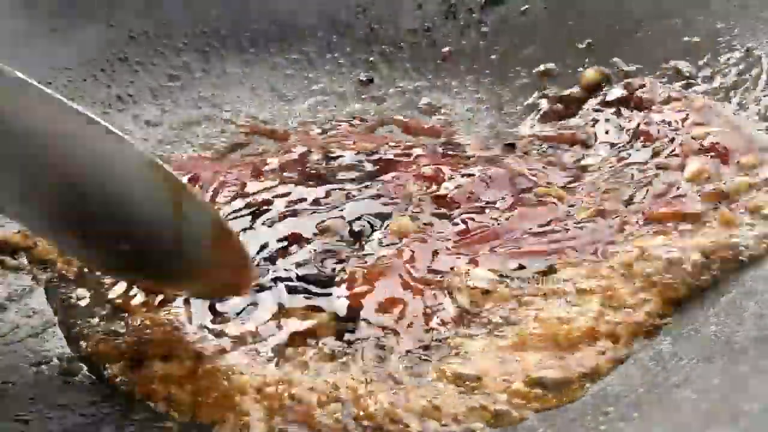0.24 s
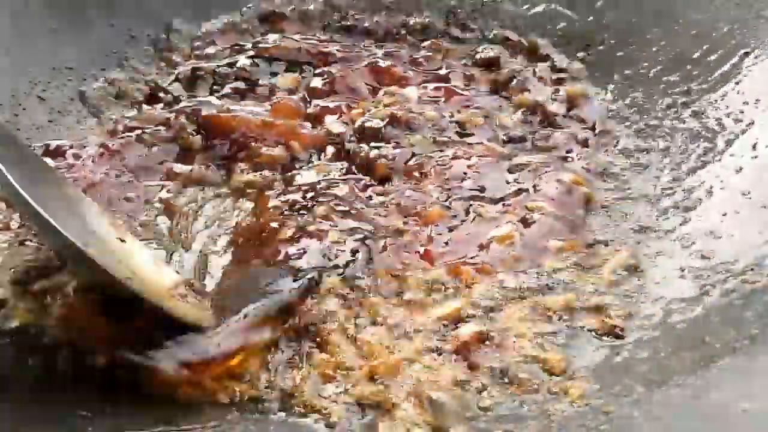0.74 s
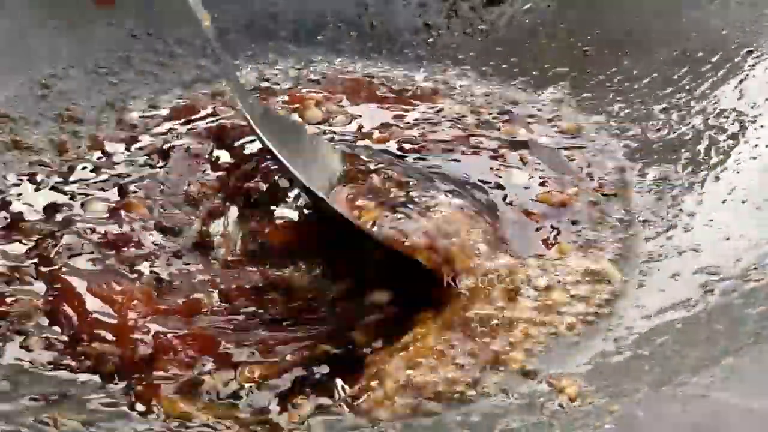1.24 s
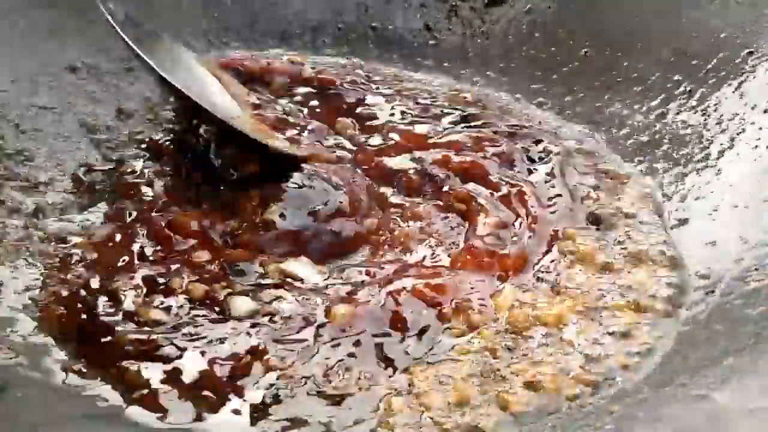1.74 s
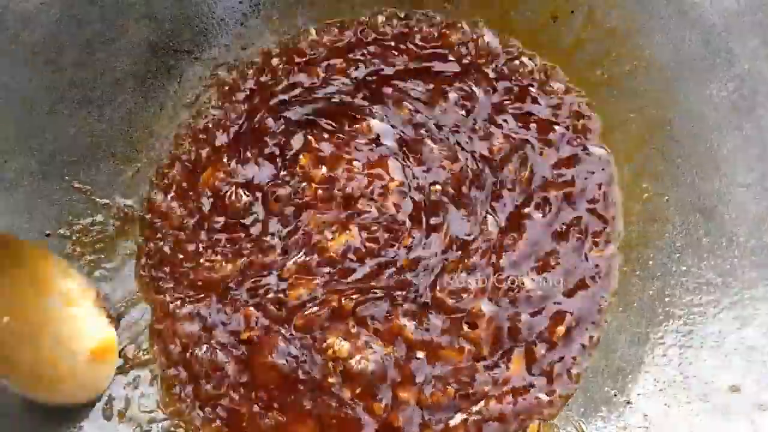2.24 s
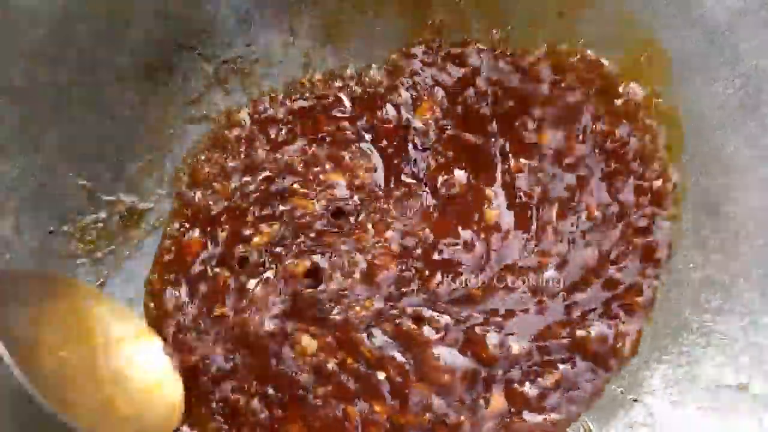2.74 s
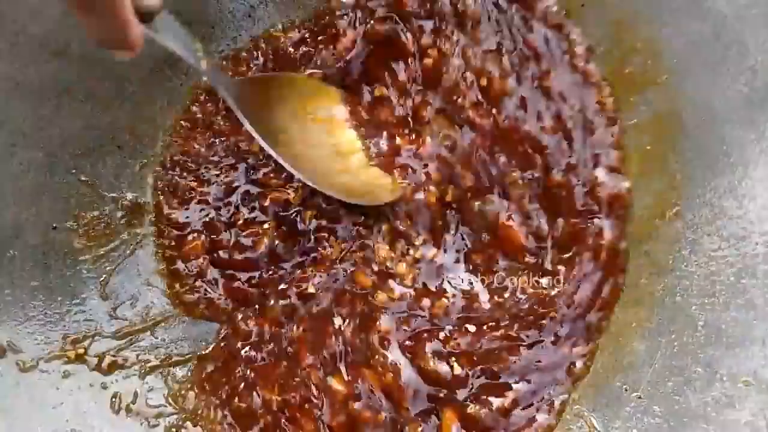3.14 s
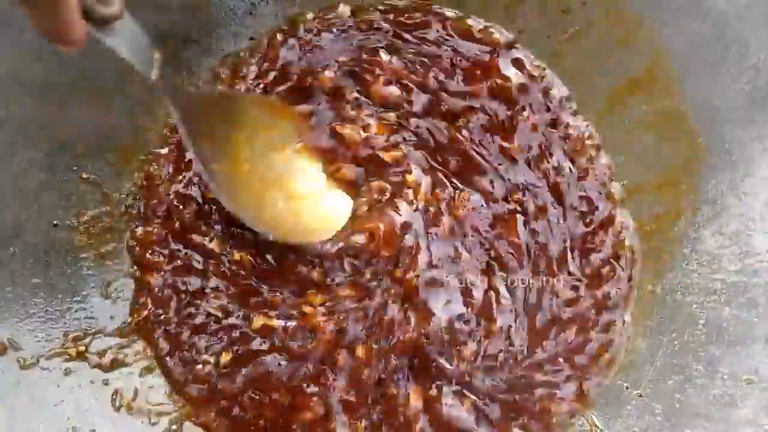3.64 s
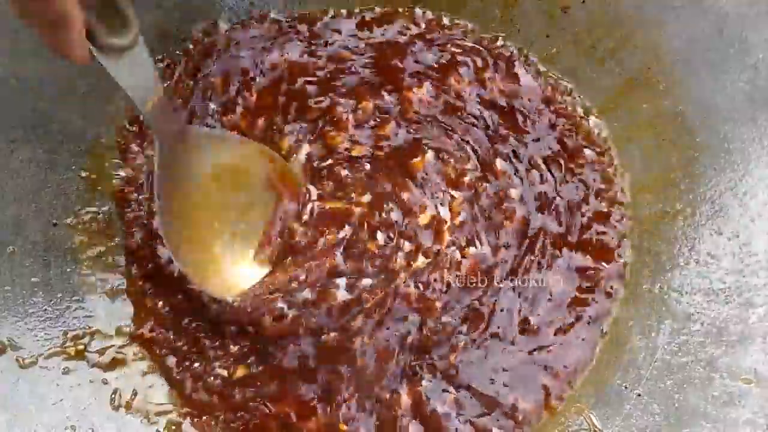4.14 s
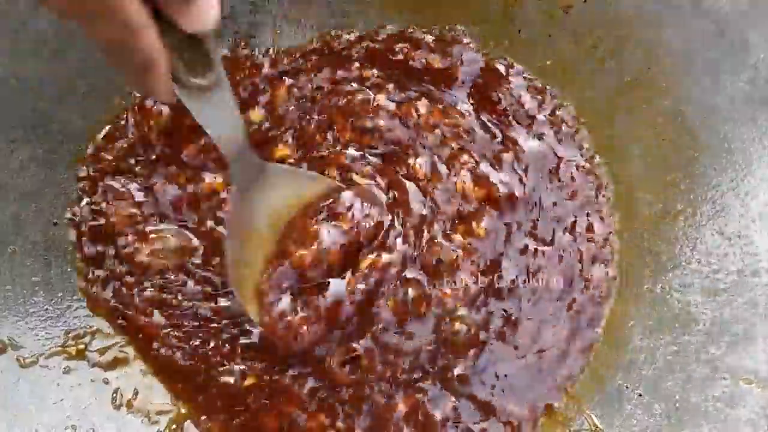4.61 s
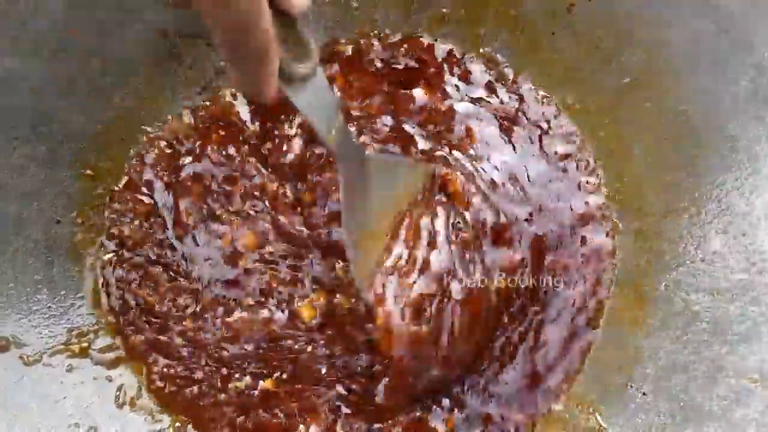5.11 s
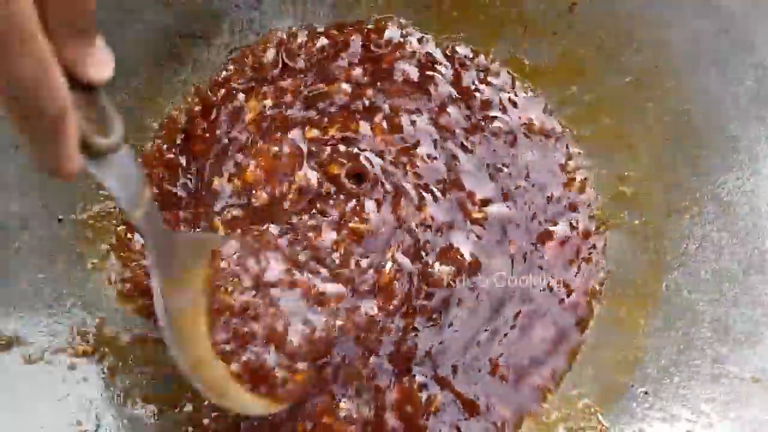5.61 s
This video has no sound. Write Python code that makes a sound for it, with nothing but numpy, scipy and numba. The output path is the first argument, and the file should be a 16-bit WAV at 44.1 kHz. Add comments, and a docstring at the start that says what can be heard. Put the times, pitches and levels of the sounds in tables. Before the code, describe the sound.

Sauce sizzles brightly in a wok, then bubbles thickly while a metal spatula stirs and scrapes the steel.

```python
"""Sugary sauce frying in a steel wok

Two scenes, heard from close by. First steam pockets burst in hot oil as a bright sizzle; after a
short silence the thickened sauce fades in, its bubbles ringing lower and wetter. A metal spatula
stirs throughout: stick-slip friction and impacts excite the steel, which answers with a dull ring."""
import sys
import numpy as np
from scipy import signal
from scipy.fft import rfft, irfft, next_fast_len
from scipy.io import wavfile
from scipy.ndimage import uniform_filter1d
from numba import njit

SR = 44100
rng = np.random.default_rng(int(sys.argv[2]) if len(sys.argv) > 2 else 0)


def pcm_store(signal):
    """Save signal as 16-bit PCM."""
    levels = np.round(np.clip(np.atleast_2d(signal), -1, 1) * 32767)
    wavfile.write(sys.argv[1], SR, levels.astype(np.int16).T)


N = 258867
TIME = np.arange(N) / SR


def frying(push, flare):
    """Rapid boiling: thin sauce meets hot oil and sizzles brightly while it is stirred."""
    # Spectra. Each row: frequency in Hz, relative level in dB.
    sizzle_spectrum = [(500, -16), (1200, -3), (2200, 2), (3200, -4.5), (4400, -9), (5100, -1), (7000, -6),
                       (9000, -2.5), (12000, -6), (15500, -11.5)]
    scrape_spectrum = [(150, -32), (600, -17), (1300, -9), (2000, -5), (3100, 4), (4400, 6.5), (5200, -9),
                       (7500, -8), (11000, -34)]
    bubble_spectrum = [(200, -26), (400, -11), (620, -6), (800, 3), (1000, -1.5), (1280, 5.5), (1750, -19),
                       (2500, -26)]
    # Sizzle of the sauce spreading over hot steel. Each row: time in seconds, relative level in dB.
    heat_curve = [(0.0, -25.5), (0.7, -28), (1.0, -24), (1.16, -25.5), (1.33, -23.5), (1.51, -25.5),
                  (1.68, -23), (1.93, -25), (2.02, -25)]
    # Cavity resonances of the left microphone port. Each row: centre in Hz, width in Hz, gain in dB.
    port_modes = [(8480, 220, 8), (10780, 1080, 22)]
    heat = from_db(in_time(heat_curve) - 6.5) + from_db(-19) * flare
    out = heat * sizzle(sizzle_spectrum, per_s=7000, spread_db=2.5, flutter_db=0.5, surge_db=1.37,
                        pan_db=-3.5)
    out += heat * from_db(-8) * crackle(per_s=530, spread_db=0.5, clump_db=4)
    blade = scrape(scrape_spectrum, blade_hz=3210, width_hz=1050, blade_db=-4, judder_db=0.5,
                   lag_ms=-0.046, pan_db=-1.4)
    bubbles = bubbling(bubble_spectrum, per_s=700, cycles=9.7, lag_ms=-0.1, pan_db=1)
    out += stirred(-30, push, 0.99) * blade
    out += stirred(-46.5, push, -15.5) * bubbles
    out += stirred(-47.5, push, -17.5) * wok_ring(tuning=1.054, per_s=1100, ringing=1, lag_ms=-0.04)
    out[0] = lift(out[0], port_modes)
    return out + rumble(level_db=-60.5, waver_db=4)


def simmering(push, flare):
    """Boiling in a viscous liquid: the thickened sauce bubbles and smothers the sizzle."""
    # Spectra. Each row: frequency in Hz, relative level in dB.
    sizzle_spectrum = [(500, -14), (1300, -2.5), (2300, -7), (3400, 10.5), (4900, 1), (5800, -9),
                       (8000, -8.5), (11000, -9.5), (13000, -12), (15500, -25)]
    scrape_spectrum = [(600, -26), (1400, -3), (1680, -4), (2100, 3), (2500, 1), (2900, 3), (3400, -1.5),
                       (4900, -1.5), (5900, -8), (8500, -16.5), (13000, -32)]
    bubble_spectrum = [(150, -19), (260, -5), (490, -4), (580, 3), (680, -1.5), (820, 0), (1000, -3),
                       (1220, 4.5), (1450, -6), (1700, -2.5), (2500, -20)]
    # The sauce heaves. Each row: time in seconds, relative bubbling level in dB.
    swell = [(2.4, -37), (3.03, -35), (4.09, -37.5), (5.21, -36.5), (5.41, -39.5), (5.85, -36)]
    # Cavity resonances of the right microphone port. Each row: centre in Hz, width in Hz, gain in dB.
    port_modes = [(10070, 580, 7.9), (11220, 810, 5)]
    steam = sizzle(sizzle_spectrum, per_s=5000, spread_db=2, flutter_db=1, surge_db=1.7, pan_db=-1)
    blade = scrape(scrape_spectrum, blade_hz=2425, width_hz=350, blade_db=0, judder_db=2,
                   lag_ms=0.425, pan_db=3)
    bubbles = bubbling(bubble_spectrum, per_s=2000, cycles=7.4, lag_ms=0.2, pan_db=0)
    out = stirred(-35.5, flare, 0.59) * steam
    out += stirred(-34, push, -0.68) * blade
    out += from_db(in_time(swell) + 2) * bubbles + plops()
    out += stirred(-47, flare, -5.5) * crackle(per_s=900, spread_db=-1.5, clump_db=3.5)
    out += stirred(-39.5, push, -26) * wok_ring(tuning=1, per_s=1400, ringing=0.5, lag_ms=0.17)
    out[1] = lift(out[1], port_modes)
    return out + rumble(level_db=-55.5, waver_db=3)


def sizzle(spectrum, per_s, spread_db, flutter_db, surge_db, pan_db):
    """Shot noise: steam pockets burst in clumps and surges, over a smooth hiss of far smaller ones."""
    bursts = grains(per_s, spread_db) * from_db(flutter_db * drift(150) + surge_db * drift(20))
    return place(bursts + 0.5 * rng.standard_normal((2, N)), spectrum, 0, pan_db)


def crackle(per_s, spread_db, clump_db):
    """Film rupture: thin sugary skins snap one by one, in little clusters."""
    # Each row: frequency in Hz, relative level in dB.
    spectrum = [(1200, -20), (2800, 2.5), (7000, 4), (11500, -4), (15500, -14)]
    snaps = grains(per_s, spread_db) * from_db(clump_db * np.minimum(drift(30), 1))
    return place(snaps, spectrum, 0, 0)


def bubbling(spectrum, per_s, cycles, lag_ms, pan_db, sizes=22):
    """Bubble resonance: each pop rings for a few cycles at a pitch set by the bubble's size."""
    pops = grains(per_s, 2.96)
    size_class = rng.integers(0, sizes, N)
    pitches_hz = np.geomspace(260, 2300, sizes)
    rings = sum(ring(pops * (size_class == k), hz, cycles / hz) * hz for k, hz in enumerate(pitches_hz))
    return place(rings, spectrum, lag_ms, pan_db)


def plops(swell_cycles=1.4, rise_per_s=4.9):
    """Damped oscillation: a big bubble swells and dies in a few cycles, its pitch rising as it opens."""
    # Each row: start in seconds, peak level in dB, starting pitch in Hz.
    big_bubbles = [(2.413, -29, 300), (2.452, -29, 327), (3.035, -27.5, 310), (3.222, -27.5, 560),
                   (3.484, -27, 335), (3.498, -27.5, 710), (3.74, -26, 340), (4.44, -29, 335)]
    out, t = np.zeros(N + SR), TIME[:SR // 10]
    for start, db, hz in big_bubbles:
        at, age = int(start * SR), t * hz / swell_cycles
        phase = 2 * np.pi * hz * (t + rise_per_s * t ** 2 / 2)
        out[at:at + len(t)] += from_db(db) * age * np.exp(1 - age) * np.sin(phase)
    return out[:N]


def spits(gain_db):
    """Flash boiling: a drop turns to steam on bare metal in one burst of noise."""
    # Each row: start in seconds, relative level in dB, decay in seconds, low and high band edges in Hz.
    drops = [(3.3627, -35, 0.016, 4100, 8900), (5.028, -41, 0.0068, 5500, 12500),
             (5.451, -35, .004, 8850, 11000)]
    return sum(band(from_db(db + gain_db) * impact(start, decay_s, chatter=0.93), low_hz, high_hz)
               for start, db, decay_s, low_hz, high_hz in drops)


def spatula():
    """Friction and impact: the edge rasps on bare metal, knocks, and makes the bowl groan when pushed."""
    # Each row: middle and nominal length in seconds, relative level in dB, start, end and width in Hz.
    rasp_contacts = [(.492, .023, -28, 3100, 2920, 160), (.5, .07, -35.5, 5250, 5500, 600),
                     (.513, .028, -28, 3740, 3560, 200), (.572, .065, -37, 2170, 1890, 280),
                     (.626, .05, -36.5, 2000, 2600, 1000), (.915, .1, -37, 2300, 2850, 700),
                     (1.4, .037, -33.5, 3000, 3370, 300), (2.63, .05, -35, 2450, 2650, 350),
                     (2.975, .058, -31, 2080, 2290, 220), (3.045, .025, -34.5, 3700, 3900, 1200),
                     (3.055, .05, -37, 1620, 1570, 400), (3.23, .06, -37, 4300, 4100, 1600),
                     (3.283, .05, -35.5, 2300, 2200, 900), (3.402, .029, -35, 2480, 2520, 140),
                     (3.562, .055, -34, 2170, 2370, 280), (3.688, .017, -33, 2000, 3600, 160),
                     (3.77, .017, -36.5, 2170, 2200, 120), (3.997, .036, -35, 2270, 2240, 240),
                     (4.29, .07, -35.5, 2600, 3200, 1100), (4.383, .034, -32.5, 2020, 2400, 260),
                     (4.68, .06, -37.5, 3400, 3600, 1200), (4.997, .026, -33.5, 3700, 4300, 1500),
                     (5.048, .05, -35, 2580, 2450, 280), (5.228, .07, -36, 2310, 2180, 400),
                     (5.64, .035, -32.5, 3640, 3560, 200), (5.665, .1, -36.5, 2500, 2100, 500),
                     (5.76, .085, -37, 1640, 1540, 360)]
    groan_contacts = [(.505, 0.091, -38, 470, 425, 22), (.6, 0.18, -43, 434, 402, 30),
                      (1.29, .075, -46.5, 417, 400, 50), (2.98, .088, -36, 416, 402, 35),
                      (5.622, 0.036, -33.5, 412, 400, 22), (5.69, 0.062, -32, 413, 392, 22),
                      (5.755, 0.031, -33, 377, 400, 22)]
    # Each row: frequency in Hz, relative level in dB.
    rasp_spectrum = [(150, -45), (600, -14), (1400, 0), (5300, 0), (6300, -9), (9000, -16)]
    groan_spectrum = [(60, -21), (150, -3), (330, 6.5), (520, 6.5), (1000, -48)]
    rasps = rubs(rasp_contacts, rasp_spectrum, grit_db=-8, judder_db=2, pan_db=1.5, voices=3)
    groans = rubs(groan_contacts, groan_spectrum, grit_db=-16, judder_db=0.5, pan_db=0, voices=2)
    taps = knocks(click_db=4, ring_db=-6, ring_t60=0.008, thud_hz=410, thud_t60=0.02)
    return from_db(7.5) * rasps + from_db(2.5) * groans + taps


def scrape(spectrum, blade_hz, width_hz, blade_db, judder_db, lag_ms, pan_db):
    """Stick-slip friction in the sauce excites the blade's damped resonance and the steel's."""
    # Upper modes of the steel. Each row: centre in Hz, width in Hz, gain in dB.
    steel_modes = [(1553, 91, -4), (2020, 100, -5.5)]
    slips = grains(6000, 2.7) * from_db(judder_db * drift(130))
    return place(lift(slips, [(blade_hz, width_hz, blade_db)] + steel_modes), spectrum, lag_ms, pan_db)


def rubs(contacts, spectrum, grit_db, judder_db, pan_db, voices):
    """Friction-driven resonance: metal slips on metal, and the pitch glides with the contact point."""
    force = np.zeros((voices, N))
    pitch_hz = np.full((voices, N), float(contacts[0][3]))
    width_hz = np.full((voices, N), float(contacts[0][5]))
    for k, (middle, length, db, start_hz, end_hz, width) in enumerate(contacts):
        voice = k % voices   # several parts of the edge can touch at once
        along = (TIME - middle) / length
        touching = abs(along) < 0.6
        force[voice, touching] += from_db(db) * np.cos(np.pi * along[touching] / 1.2)
        pitch_hz[voice, touching] = start_hz + (end_hz - start_hz) * (along[touching] + 0.5)
        width_hz[voice, touching] = width   # narrow on the edge, wide on the flat
    out = 0
    for pressure, hz, width in zip(force, pitch_hz, width_hz):
        slips = grains(6000, 6.1)
        tone = gliding_resonance(slips, 2 * np.pi * hz / SR, np.exp(-np.pi * width / SR))
        tone /= np.sqrt(uniform_filter1d(tone ** 2, size=500) + 1e-12)   # friction holds the swing steady
        judder = from_db(judder_db * drift(260))
        out += pressure * place(judder * (tone + from_db(grit_db) * slips), spectrum, 0, pan_db)
    return out


def knocks(click_db, ring_db, ring_t60, thud_hz, thud_t60):
    """Impact excitation: the edge clicks and rings at a pitch set by where it lands; the bowl thuds."""
    # Each row: start in seconds, relative edge level in dB, ring pitch in Hz, relative thud level in dB.
    strikes = [(.3949, -6.8, 3900, -17.5), (.3976, -10, 4400, -26), (1.018, -20, 4400, -24),
               (1.131, -26, 3300, -26), (1.245, -28, 3300, -22), (1.64, -28, 3300, -26),
               (2.931, -18, 2450, -32), (3.084, -16, 2510, -36), (3.764, -17, 1280, -33),
               (4.928, -18, 2280, -34), (4.9906, -7, 2520, -35), (5.033, -16.5, 2380, -36),
               (5.234, -17, 2150, -26)]
    out = 0
    for start, edge_db, hz, thud_db in strikes:
        edge = impact(start, chatter_s=0.003, chatter=0.3)
        push = impact(start, chatter_s=0.0018, chatter=0.018)
        click = from_db(click_db) * band(band(edge, 700, 5500), 700, 5500)
        out += from_db(edge_db) * (click + from_db(ring_db) * ring(push, hz, ring_t60))
        out += from_db(thud_db) * band(ring(push, thud_hz, thud_t60), 257, 690)
    return out


def wok_ring(tuning, per_s, ringing, lag_ms):
    """Modal vibration: rubbing and bursting bubbles shake the bowl, whose tuning depends on its load."""
    # Each row: frequency in Hz before tuning, relative level in dB, 60 dB decay time in seconds.
    low_modes = [(320, -2, 0.044), (370.6, -6, 0.1), (425, 3.5, 0.025), (470, -10, 0.04)]
    # Each row: frequency in Hz before tuning, relative level in dB.
    spectrum = [(90, -24.5), (190, -18.5), (250, -5.5), (310, -3.5), (400, -2.5), (470, -7), (560, -4),
                (800, -35), (2000, -56)]
    shoves = grains(per_s, 2.1)
    modes = sum(from_db(db) * ring(shoves, hz * tuning, t60) for hz, db, t60 in low_modes)
    vibration = ringing * rms_one(modes) + grains(per_s, 4.2)
    return place(vibration, np.array(spectrum) * [tuning, 1], lag_ms, 0)


def stirring():
    """Amplitude envelopes: each stroke pushes the blade, and the sizzle flares on the bared steel."""
    # Each row: start and length in seconds, relative push and flare levels in dB.
    strokes = [(-.04, 0.12, -29.5, -37), (0.13, 0.18, -48, -26), (0.438, 0.23, -29, -46),
               (0.806, 0.38, -32, -54), (1.19, 0.14, -38, -32), (1.5, 0.32, -37, -36),
               (1.858, 0.17, -38.5, -30), (2.38, 0.21, -30, -38.5), (2.56, 0.093, -27.5, -41),
               (2.908, 0.27, -30.5, -36), (3.174, 0.28, -31.5, -39.5), (3.501, 0.12, -29, -43),
               (3.79, 0.14, -33.5, -43), (3.933, 0.08, -28.5, -31), (4.118, 0.045, -27, -30),
               (4.2, 0.28, -32, -40), (4.557, 0.27, -30, -42.5), (4.9, 0.26, -31, -39),
               (5.142, 0.12, -31.5, -36.5), (5.599, 0.26, -29.5, -33)]
    push, flare = np.zeros((2, N))
    for start, length, push_db, flare_db in strokes:
        bearing_down = trapezoid(start, length, rise_s=0.025, fall_s=0.064)
        steam = trapezoid(start, length, rise_s=0.08, fall_s=0.03)   # lasts until the sauce flows back
        push = np.maximum(push, from_db(push_db) * bearing_down)
        flare = np.maximum(flare, from_db(flare_db) * steam)
    return push, flare


def rumble(level_db, waver_db):
    """Modulated low-frequency noise: the uneven background of the kitchen."""
    # Each row: frequency in Hz, relative level in dB.
    spectrum = [(20, -4), (45, -5), (100, -0.5), (150, -1), (220, -19), (600, -37), (3000, -51)]
    return from_db(level_db + waver_db * drift(7.1)) * place(rng.standard_normal((2, N)), spectrum, 0, 0)


def place(streams, spectrum, lag_ms, pan_db):
    """Partial coherence: two streams become a coloured stereo pair of rms 1, unrelated in the treble."""
    # Each row: frequency in Hz, left-right likeness from 0 to 1.
    likeness = [(30, 0.3), (120, 0.86), (350, 0.98), (700, 0.86), (1250, 0.65), (1600, .35), (2300, 0.41),
                (3500, 0), (15000, 0.05)]
    size = next_fast_len(N + 2048)
    hz = np.arange(size // 2 + 1) * SR / size
    mid, side = rfft(streams, size) * from_db(at_hz(spectrum, hz))
    alike = np.clip(at_hz(likeness, hz), 0, 0.995)
    mid, side = mid * np.sqrt(1 + alike), side * np.sqrt(1 - alike)
    delay = np.exp(-2j * np.pi * hz * lag_ms / 1000)
    left = (mid + side) * from_db(pan_db / 2)
    right = (mid - side) * delay * from_db(-pan_db / 2)
    return rms_one(irfft(np.array([left, right]), size)[:, :N])


def stirred(rest_db, drive, drive_db):
    """Power addition: the gain of a sound that goes on by itself and grows with the stirring."""
    return np.hypot(from_db(rest_db), from_db(drive_db) * drive)


def trapezoid(start, length, rise_s, fall_s):
    """A linear rise, a hold, and a fall centred on the end."""
    rise = np.clip((TIME - start) / rise_s, 0, 1)
    fall = np.clip((start + length - TIME) / fall_s + 0.5, 0, 1)
    return rise * fall


def grains(per_s, spread_db):
    """A Poisson process: two streams of random clicks of uneven size."""
    born = rng.random((2, N)) < per_s / SR
    size = from_db(spread_db * np.clip(rng.standard_normal((2, N)), -2.5, 2.5))
    return rms_one(born * size * rng.choice([-1, 1], (2, N)))


def impact(start, chatter_s, chatter):
    """An impulse and its exponentially dying chatter, different on each side."""
    out, at = np.zeros((2, N)), int(start * SR)
    out[:, at:at + 4096] = chatter * rng.standard_normal((2, 4096)) * np.exp(-TIME[:4096] / chatter_s)
    out[:, at] = 1
    return out


def ring(clicks, hz, t60):
    """A damped oscillator: a unit click sets a sine of height 1 ringing."""
    r, w = np.exp(-np.log(1000) / (t60 * SR)), 2 * np.pi * hz / SR
    return signal.lfilter([0, np.sin(w)], [1, -2 * r * np.cos(w), r * r], clicks + 1e-18)


def lift(x, modes):
    """Parallel resonances add to the direct sound."""
    return x + sum(from_db(db) * resonance(x, hz, width) for hz, width, db in modes)


def resonance(x, hz, width_hz):
    """A two-pole resonator with a peak gain of 1."""
    r = np.exp(-np.pi * width_hz / SR)
    feedback = [1, -2 * r * np.cos(2 * np.pi * hz / SR), r * r]
    return signal.lfilter(np.array([1, 0, -1]) * (1 - r * r) / 2, feedback, x + 1e-18)


@njit
def gliding_resonance(x, angle, radius):
    """A resonator whose centre and width move from sample to sample."""
    y = np.zeros_like(x)
    for i in range(2, x.shape[1]):
        r = radius[i]
        for c in range(x.shape[0]):
            drive = (1 - r * r) / 2 * (x[c, i] - x[c, i - 2])
            y[c, i] = drive + 2 * r * np.cos(angle[i]) * y[c, i - 1] - r * r * y[c, i - 2]
    return y


def band(x, low_hz, high_hz):
    """A band-pass filter."""
    sections = signal.butter(2, [low_hz, min(high_hz, 0.45 * SR)], "band", fs=SR, output="sos")
    return signal.sosfilt(sections, x + 1e-18)


def drift(per_s):
    """A random fluctuation of rms 1."""
    knots = rng.standard_normal(4000)
    return rms_one(np.interp(TIME * per_s, np.arange(len(knots)), knots))


def at_hz(points, hz):
    """Interpolation on a log-frequency axis."""
    known_hz, values = np.transpose(points)
    return np.interp(np.log(hz + 1), np.log(known_hz), values)


def in_time(rows):
    """Interpolation of a curve at every sample."""
    return np.interp(TIME, *np.transpose(rows))


def rms_one(x):
    """Scaling to unit power."""
    return x / np.sqrt(np.mean(x ** 2) + 1e-20)


def from_db(db):
    """Decibels to gain."""
    return 10 ** (np.asarray(db) / 20)


def scene():
    """Superposition: frying, then simmering, with spitting drops and the spatula on top."""
    # The two scenes. Each row: start and end in seconds.
    spans = [(-0.01, 2.039), (2.121, 5.9)]
    # The simmering dips briefly: middle and half length in seconds, depth in dB.
    lull = (5.475, 0.025, -3)
    lull_s, lull_half_s, lull_db = lull
    dip = from_db(lull_db * np.exp(-((TIME - lull_s) / lull_half_s) ** 2))
    first, second = [np.clip(np.minimum(TIME - start, end - TIME) / 0.00056, 0, 1) for start, end in spans]
    fade_s, fade_from = 0.27, 0.22
    fade_remaining = np.clip(1 - (TIME - spans[1][0]) / fade_s, 0, 1)
    fade_in = fade_from ** (fade_remaining ** 1.5)
    push, flare = stirring()
    sauce = first * frying(push, flare) + second * fade_in * dip * simmering(push, flare)
    return sauce + spits(gain_db=16.5) + spatula()


def record(dry, cutoff_hz=15800):
    """Band limiting: a steep low-pass cuts the top of the sound and of a faint noise floor."""
    hiss = from_db(-82) * rng.standard_normal((2, N))
    return signal.sosfilt(signal.ellip(12, 0.1, 90, cutoff_hz, fs=SR, output="sos"), dry + hiss)


dry = scene()
out = record(dry)
pcm_store(out)
```